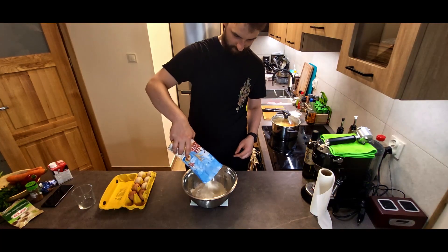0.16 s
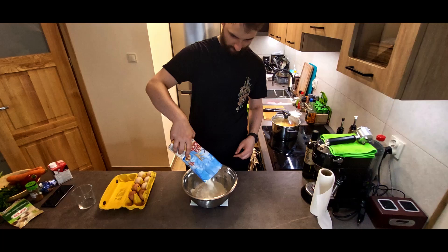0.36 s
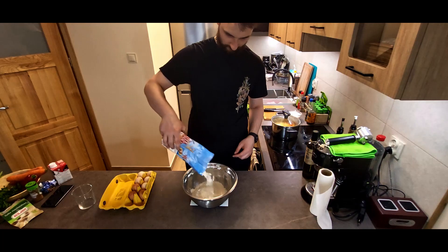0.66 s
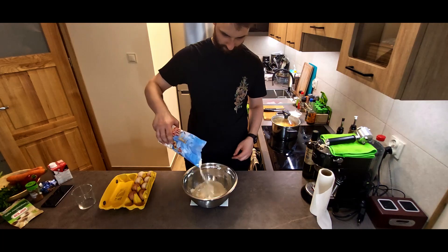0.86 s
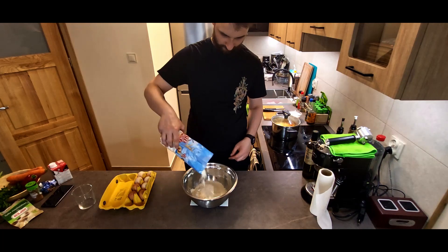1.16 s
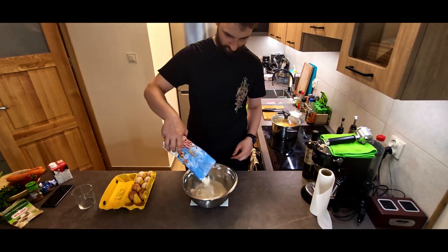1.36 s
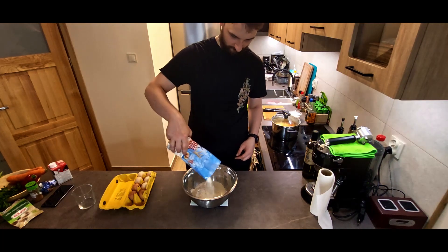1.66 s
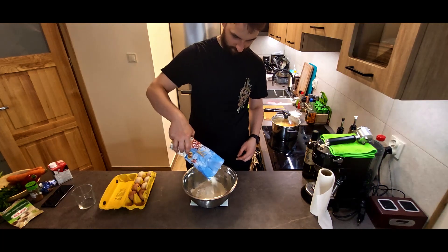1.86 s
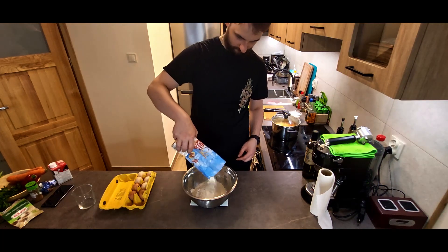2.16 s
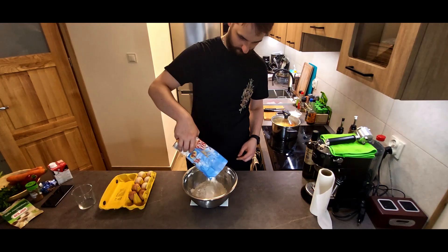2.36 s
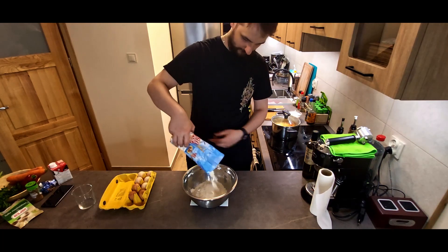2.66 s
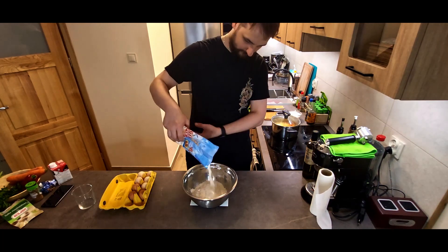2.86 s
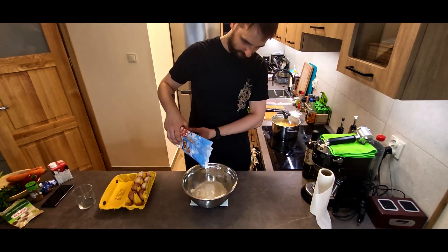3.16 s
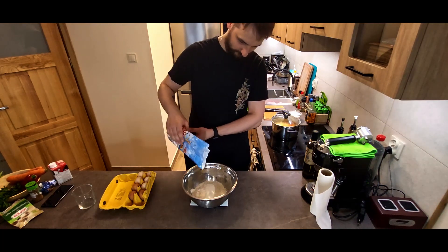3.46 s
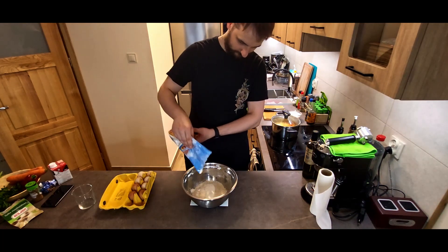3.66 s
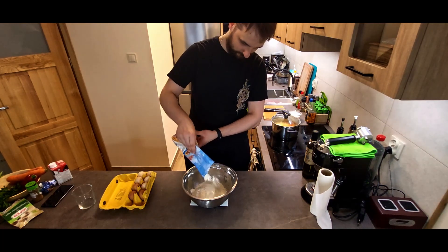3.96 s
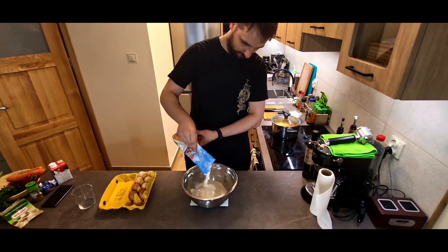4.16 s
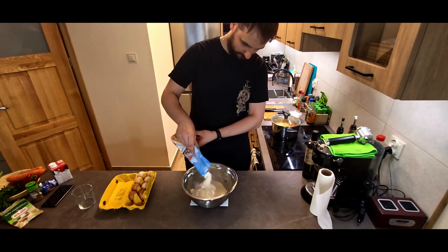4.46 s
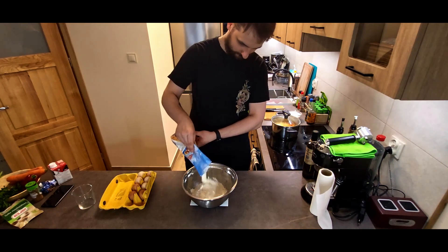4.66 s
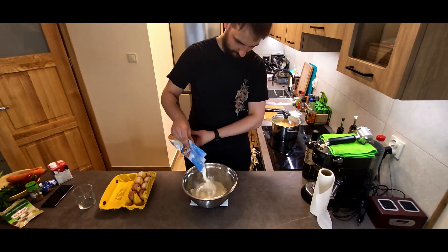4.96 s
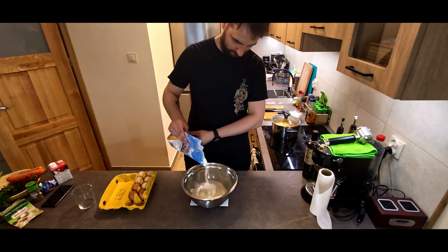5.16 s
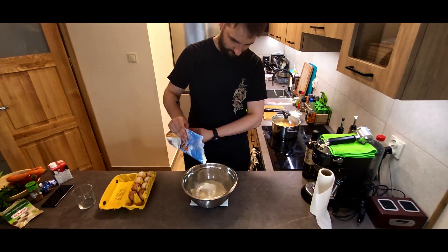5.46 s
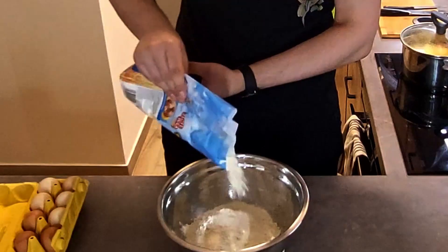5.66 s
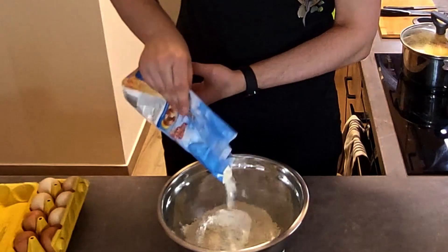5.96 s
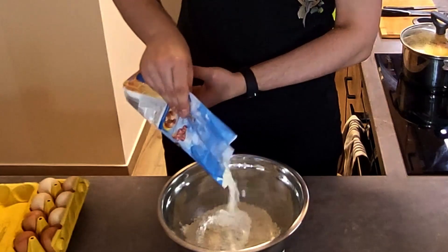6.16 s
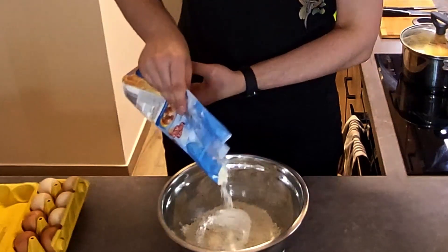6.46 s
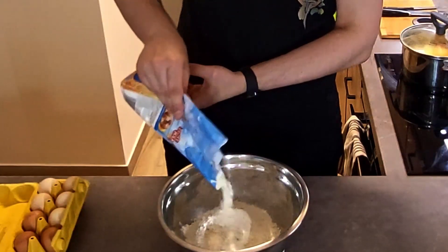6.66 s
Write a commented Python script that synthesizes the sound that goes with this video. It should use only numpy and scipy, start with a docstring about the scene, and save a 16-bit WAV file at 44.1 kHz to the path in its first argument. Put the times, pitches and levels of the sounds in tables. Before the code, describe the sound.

Over a very quiet low rumble of kitchen air, a paper flour bag rustles softly, with tiny ticks around 0.1 s and faint powdery swishes until 0.8 s. From 1.0 to 1.8 s crisp creases snap and pop separately, mixed with short shaking swishes. From 1.9 to 3.0 s it is gentler: quick, even wrist strokes of sliding flour and a few light ticks. Crinkling resumes at 3.05 s and swells into the densest, loudest crumple at 3.5-3.95 s, with bright cracks and hollow bag thuds. After a short calm, another flurry runs 4.4-5.0 s, ending in soft swishes. A near lull follows, then strong pops and crumpling at 5.65-6.2 s, and a last sharp cluster at 6.5-6.8 s. The steel bowl rings faintly beneath; close, almost mono sound with a short small-room tail.

```python
"""A quiet rumble of air and a soft paper rustle open the scene: flour is shaken from a paper bag into a steel bowl.
Squeezes crumple the paper in flurries of noise; creases snap, and their panels pop, ring and shove air.
The bag's walls bulge with hollow low noise as the load slumps; wrist strokes swish flour along the paper.
Resonators make the bowl ring faintly, and echoes with a decaying noise tail make a small kitchen.
Both channels hear nearly the same."""
import sys
import numpy as np
from scipy import signal
from scipy.fft import rfft, irfft
from scipy.io import wavfile
from scipy.ndimage import uniform_filter1d

SR = 44100
rng = np.random.default_rng(int(sys.argv[2]) if len(sys.argv) > 2 else 0)


def put_to_file(sound):
    """Save the sound as 16-bit audio at rate SR, in the file named by the first command-line argument."""
    columns = np.atleast_2d(sound).T  # one column per channel
    safe = np.clip(columns, -1, 1)
    whole_steps = np.round(safe * 32767)
    wavfile.write(sys.argv[1], SR, whole_steps.astype(np.int16))


N = 300321


def from_db(db):
    """Level law: gain is ten to the power of dB / 20."""
    return 10 ** (np.asarray(db) / 20)


def rms_one(x):
    """Normalisation: scale to unit power."""
    return x / np.sqrt(np.mean(x ** 2) + 1e-20)


def evened(x):
    """Level equalisation: divide by the running rms over 50 ms to take out slow swings."""
    return x / np.sqrt(np.abs(uniform_filter1d(x ** 2, size=2200)) + 1e-6)


def in_time(rows):
    """Linear interpolation: each column of a curve, at every sample."""
    s, *columns = np.transpose(rows)
    return [np.interp(np.arange(N) / SR, s, c) for c in columns]


def at_hz(points, hz):
    """Logarithmic pitch: read a table on a log-frequency axis."""
    f, value = np.transpose(points)
    return np.interp(np.log(np.maximum(hz, 1)), np.log(f), value)


def causal_filter(spectrum, size=2048):
    """Minimum phase: fold the cepstrum of a colour into a causal impulse response."""
    hz = np.maximum(np.fft.rfftfreq(size, 1 / SR), 1)
    octaves_out = np.abs(np.log2(hz / np.clip(hz, spectrum[0][0], spectrum[-1][0])))
    # the colour falls 20 dB per octave for two octaves beyond its ends
    level_db = at_hz(spectrum, hz) - 20 * np.minimum(octaves_out, 2)
    cepstrum = irfft(np.log(from_db(level_db)))
    cepstrum[1:size // 2] *= 2
    cepstrum[size // 2 + 1:] = 0
    return irfft(np.exp(rfft(cepstrum)))


def coloured(x, spectrum):
    """Linear filtering: convolve with a colour's response; unit power."""
    return rms_one(signal.oaconvolve(x, causal_filter(spectrum))[:N])


def ring(x, hz, t60):
    """Damped resonance: a two-pole filter with a gain of about 1 at its top."""
    r, w = from_db(-60 / (t60 * SR)), 2 * np.pi * hz / SR
    return signal.lfilter([0, 2 * (1 - r) * np.sin(w)], [1, -2 * r * np.cos(w), r * r], x + 1e-18)


def add(track, s, sound):
    """Superposition: mix a sound in at a time."""
    at = int(np.clip(s * SR, 0, N - 1))
    track[at:at + len(sound)] += sound[:N - at]


def clicks(per_s, spread_db):
    """Shot noise: random clicks of uneven size and either sign; unit power."""
    sizes = from_db(spread_db * np.minimum(rng.exponential(1, N), 4)) * rng.choice([-1, 1], N)
    return rms_one(sizes * (rng.random(N) < per_s / SR))


def grains(per_s, spread_db, rub):
    """Granular friction: many small slips (clicks) over smooth rubbing (white noise)."""
    return evened(clicks(per_s, spread_db) + rub * rng.standard_normal(N))


def gestures(rows, attack_s, release_s):
    """Envelope: exponential attack, hold and exponential release for each row; a gain at every sample."""
    t = np.arange(N) / SR
    total = 0
    for s, held, db in rows:
        before = np.maximum(s - t, 0) / attack_s
        after = np.maximum(t - s - held, 0) / release_s
        total = total + from_db(db) * np.exp(-np.minimum(before + after, 20))
    return total


# colour of the room air: hz [Hz], level_db [dB]
AIR_COLOUR = [(20, -27), (40, -3.5), (70, 5.5), (130, -3.5), (300, -3.5), (600, -7), (1000, -36),
              (2000, -24), (4500, -37.5), (7000, -22.5), (9000, -28.5), (16000, -25.5)]
# colour of the hollow bag: hz [Hz], level_db [dB]
HOLLOW_COLOUR = [(35, -31.5), (70, 0), (120, -1), (220, 0.5), (320, -5.5), (430, -15), (700, -14.5)]


def air():
    """Diffuse background: steady coloured noise, as a shared (mid) and an opposed (side) part."""
    mid = from_db(-58.0) * coloured(rng.standard_normal(N), AIR_COLOUR)
    side = from_db(-74.5) * coloured(rng.standard_normal(N), AIR_COLOUR)
    side = side + from_db(-76.5) * coloured(rng.standard_normal(N), HOLLOW_COLOUR)
    return mid, side


# how hard the hand flexes the paper as it holds the bag, before the trims in rustle():
# start_s [s], crumple_db [dB], fizz_db [dB]
FLEXING_EFFORT = [(0, -47, -45.5), (0.6, -55, -55.5), (0.98, -49.5, -57), (1.2, -44.5, -51),
                  (1.6, -46.5, -50.5), (2.12, -50, -58), (2.86, -50, -52.5), (2.98, -57.5, -58.5),
                  (3.15, -35.5, -49.5), (3.35, -48, -46.5), (3.8, -37, -37), (4.27, -48, -54),
                  (4.6, -37.5, -42.5), (5.02, -50, -51.5), (5.12, -57, -65), (5.64, -57, -66),
                  (6.25, -38.5, -49.5), (6.48, -53, -55)]
# the fingers tighten and the paper crumples, before the same trims:
# start_s [s], held_s [s], crumple_db [dB], fizz_db [dB]
SQUEEZE_EFFORT = [(1.07, 0.027, -36.5, -43), (3.105, 0.027, -36, -42.5), (3.50, 0.17, -41, -44.5),
                  (3.74, 0.049, -25.5, -23.5), (3.82, 0.074, -29.5, -41), (3.969, 0.024, -22.5, -26.5),
                  (4.44, .15, -31.5, -31), (5.70, 0.16, -28.5, -33), (5.90, 0.29, -36, -49),
                  (6.629, .15, -29.5, -38.5)]
SQUEEZE_ATTACK_S, SQUEEZE_RELEASE_S = 0.012, 0.03


def paper_effort():
    """Power addition: steady flexing and squeezes together; crumple dB and fizz dB at every sample."""
    efforts_db = []
    for k, flex_db in enumerate(in_time(FLEXING_EFFORT)):
        rows = [(s, held, levels[k]) for s, held, *levels in SQUEEZE_EFFORT]
        squeeze = gestures(rows, SQUEEZE_ATTACK_S, SQUEEZE_RELEASE_S)
        efforts_db.append(20 * np.log10(np.hypot(from_db(flex_db), squeeze)))
    return efforts_db


def small_panels(per_s=200, spread_db=3.0, cycles=10, count=16):
    """Modal excitation: small paper facets flip at random, each ringing at a pitch of its own."""
    flips, facet = clicks(per_s, spread_db), rng.integers(0, count, N)
    total = 0
    for k, hz in enumerate(np.geomspace(450, 3800, count)):
        total = total + ring(flips * (facet == k), hz, cycles / hz)
    return rms_one(total)


def avalanches(per_s, depth, decay_s):
    """Avalanche dynamics: creases set off their neighbours in brief flurries; a gain of power about 1."""
    kicks = (rng.random(N) < per_s / SR) * rng.uniform(0.38, 1, N)
    flurry = signal.lfilter([1], [1, -np.exp(-1 / (decay_s * SR))], kicks + 1e-18)
    return evened(1 + 10 * depth * flurry)


# colour of the coarse crumpling: hz [Hz], level_db [dB]
CRUMPLE_COLOUR = [(150, -12.5), (320, -5), (460, -3), (650, -4.5), (820, 3), (1200, -1), (2000, -10),
                  (2900, -12.5), (4500, -20)]
# colour of the fine fizz of fibres: hz [Hz], level_db [dB]
FIZZ_COLOUR = [(2000, 1), (3500, -3), (4500, -6.5), (6000, -3.5), (7300, -9), (8600, -9.5), (11000, -9.5),
               (16000, -21)]
BUCKLING_DB = -44   # crumple effort at which the paper buckles


def rustle(crumple_db=-4.0, fizz_db=-4.5):
    """Buckling threshold: lightly flexed paper mostly rubs, then crumples in flurries; fibres fizz on top."""
    coarse_db, fine_db = paper_effort()
    buckling = from_db(np.minimum(coarse_db - BUCKLING_DB, 0))
    flurries = 1 + buckling * (avalanches(per_s=40, depth=0.35, decay_s=0.005) - 1)
    rub = from_db(-9) * coloured(rng.standard_normal(N), CRUMPLE_COLOUR)
    coarse = evened(buckling * coloured(small_panels(), CRUMPLE_COLOUR) + rub)
    fine = coloured(grains(per_s=1500, spread_db=2.5, rub=0.7), FIZZ_COLOUR)
    return flurries * (from_db(coarse_db + crumple_db) * coarse + from_db(fine_db + fizz_db) * fine)


# the load slumps and the whole bag bulges: start_s [s], held_s [s], level_db [dB]
SLUMP_GESTURES = [(0.055, 0.036, -47), (3.575, 0.056, -35), (3.745, 0.017, -43.5), (5.80, .02, -42.5),
                  (6.59, 0.16, -40)]
SLUMP_ATTACK_S, SLUMP_RELEASE_S = 0.013, 0.058
# between slumps the walls work softly as the flour drains: start_s [s], level_db [dB]
WALL_LEVELS = [(0, -57), (1.2, -54), (2.9, -62), (4.7, -62.5), (5.5, -65), (6.3, -54.5)]


def wall_motion():
    """Power addition: the motion of the bag's walls, and by how many dB a slump raises it."""
    resting = from_db(in_time(WALL_LEVELS)[0])
    motion = np.hypot(resting, gestures(SLUMP_GESTURES, SLUMP_ATTACK_S, SLUMP_RELEASE_S))
    return motion, 20 * np.log10(motion / resting)


def bulge():
    """Wall radiation: the moving bag walls give soft, hollow knocks."""
    return wall_motion()[0] * coloured(grains(per_s=430, spread_db=3.5, rub=0.63), HOLLOW_COLOUR)


CREASES_PER_S, CREASE_HZ = 18, 1240   # candidate creases, and the usual panel pitch
CREASE_DB, CREASE_GROWTH = -44, 0.58   # pop level at buckling, dB gained per dB of further flexing
CREASE_CRACK_DB, CREASE_SPREAD_DB = -6.5, 2.5   # crack relative to pop, scatter of both levels


def lesser_creases(count=140):
    """Threshold process: small snaps at random moments, fading below buckling; rows like the loud ones."""
    chance, scatter = rng.random(count), rng.standard_normal((count, 3))
    times = np.minimum((np.arange(count) + chance) / CREASES_PER_S, N / SR)
    past_db = np.interp(times * SR, np.arange(N), paper_effort()[0]) - BUCKLING_DB
    levels = CREASE_DB + CREASE_GROWTH * past_db + np.minimum(past_db, 0)
    rows = []
    for s, db, (a, b, c) in zip(times, levels, scatter):
        hz = CREASE_HZ * 2 ** (0.5 * b)
        rows.append((s, db + CREASE_SPREAD_DB * a, hz, CREASE_CRACK_DB + CREASE_SPREAD_DB * c))
    return rows


def scattered(delay_s, size, count):
    """Dispersion: a slip spreads through the sheet, every frequency whole but with its own delay."""
    delays = delay_s * rng.gamma(2, 0.5, count)   # delay_s is their mean
    per_bin = np.interp(np.linspace(0, count - 1, size // 2 + 1), np.arange(count), delays)
    # group delay accumulates into phase
    return irfft(np.exp(-2j * np.pi * np.cumsum(per_bin) * SR / size), size)


def snap_part(force, response):
    """Impulse excitation: a short force through a response, with the energy of 6 ms at unit power."""
    x = signal.fftconvolve(force, response)[:len(force)]
    return x * np.sqrt(0.006 * SR / np.sum(x ** 2))


# the loud creases snapping, before the trims of each part in snaps():
# start_s [s], level_db [dB], pitch_hz [Hz], crack_re_pop_db [dB]
LOUD_SNAPS = [(0.0544, -39, 700, -10), (0.078, -38, 504, -14), (0.1097, -31, 1370, -11),
              (0.9144, -41.5, 744, -8), (1.0296, -26, 2190, -5.5), (1.0664, -24, 925, -3.5),
              (1.1273, -24.5, 2020, -3), (1.2089, -33, 800, -14), (1.2887, -27, 776, -19),
              (1.5962, -22, 1120, -6.5), (1.6952, -25.5, 960, -24), (1.7997, -20.5, 1580, -10),
              (2.5439, -32, 880, -21), (2.7512, -40, 2520, -3), (3.0609, -38.5, 2540, -2),
              (3.0939, -26, 910, -14.5), (3.1587, -28.5, 890, -24), (3.2733, -32.5, 1490, -6.5),
              (3.366, -30, 1010, -14), (3.4332, -29, 610, -15), (3.4751, -26, 700, -1),
              (3.5699, -25, 764, -17), (3.5805, -16, 875, -10), (3.6336, -22, 1510, -6.5),
              (3.6796, -29.5, 1560, -4), (3.7215, -18, 2090, 0.5), (3.7475, -18, 1510, -7),
              (3.7722, -16.5, 1440, 1), (3.7844, -16, 1630, -2.5), (3.842, -21, 1740, -4),
              (3.9123, -21.5, 890, 1.5), (3.9432, -25, 1380, 0.5), (4.179, -40.5, 1320, -7),
              (4.3857, -26.5, 2560, -1.5), (4.4266, -28.5, 1158, -9), (4.4434, -33.5, 1630, 6.5),
              (4.4718, -34.5, 1225, 5), (4.5457, -20.5, 1005, -3.5), (4.578, -21, 870, -7.5),
              (4.6399, -31.5, 1510, -16), (4.8122, -29.5, 1570, -4.5), (4.9553, -27, 1770, -1),
              (5.3759, -41.5, 1440, -12.5), (5.4673, -31, 1970, -4), (5.663, -19, 920, -13.5),
              (5.6927, -17.5, 1760, -2), (5.7606, -16.5, 760, -3), (5.807, -20, 900, -5.5),
              (5.9058, -28, 970, -14), (5.921, -31.5, 1190, -9), (5.9876, -31, 1090, -26),
              (6.0365, -27.5, 820, -8.5), (6.1192, -36.5, 1030, -16), (6.1819, -22.5, 1245, -20),
              (6.4897, -39, 2000, 2.5), (6.5439, -25.5, 2000, -4), (6.6253, -20.5, 814, -5),
              (6.662, -22, 2010, -10), (6.7598, -22, 843, -1.5), (6.7921, -25, 2000, -5.5)]
# colour of the panel's pop: hz [Hz], level_db [dB]
POP_COLOUR = [(350, -26), (600, -6.5), (780, 4.5), (1100, 5.5), (2000, 6), (2800, -5.5), (4200, -33.5)]
# colour of the crease's crack: hz [Hz], level_db [dB]
CRACK_COLOUR = [(1600, -23), (2500, 5.5), (3100, 3), (3600, 3), (4100, 5), (4600, 1.5), (5200, 4),
                (7400, 0), (8800, -20.5)]
# colour of the crack's bright top: hz [Hz], level_db [dB]
SPIT_COLOUR = [(7000, -10), (8500, 2.5), (11000, 4), (16000, -11)]
# colour of the shoved air: hz [Hz], level_db [dB]
THUMP_COLOUR = [(50, -15), (110, -30.5), (190, -6), (240, -1.5), (330, -8.5), (450, 1), (600, -0.5),
                (900, -39.5)]
# large, low panels shove more air, and more still while the load slumps against them
THUMP_DB_PER_OCTAVE, THUMP_FOLLOWS_SLUMP = -4.5, 0.19   # the second is dB per dB of slump


def snaps(crack_s=0.0013, pop_s=0.0025, thump_t60=0.03, flip_s=0.00046, panel_cycles=16,
          panel_db=-3.5, pop_db=-2.0, thump_db=-11.5, spit_db=6.0, spit_growth=1.695,
          after_db=-18.0, after_t60=0.0094, mode_db=-8.5, size=2600, count=10):
    """Snap-through: a crease cracks, its panel flips and rings, and shoves air; a track for each facing."""
    out, t = np.zeros((count, N)), np.arange(size) / SR
    colours = (POP_COLOUR, CRACK_COLOUR, SPIT_COLOUR, THUMP_COLOUR)
    pop_ir, crack_ir, spit_ir, thump_ir = [causal_filter(c) for c in colours]
    flip = 1 - np.exp(-t / flip_s)   # a panel takes a moment to get moving
    slump_db = wall_motion()[1]
    for k, (s, level_db, hz, high_db) in enumerate([*LOUD_SNAPS, *lesser_creases()]):
        low_db = THUMP_DB_PER_OCTAVE * np.log2(hz / CREASE_HZ)
        low_db += THUMP_FOLLOWS_SLUMP * slump_db[min(int(s * SR), N - 1)]
        white = rng.standard_normal((2, size))

        # the main slip is trailed by a run of tiny ones and coloured by the panel's second mode
        slips = scattered(crack_s, size, count=60) + from_db(after_db - 60 * t / after_t60) * white[0]
        second_mode = ring(slips, 2 * hz, 0.5 * panel_cycles / (2 * hz))
        crack = snap_part(slips + from_db(mode_db) * second_mode, crack_ir)
        spit = snap_part(slips, spit_ir)

        # the pop is broadly centred on the panel's pitch
        push = scattered(pop_s, size, count=130)
        pop = snap_part(push + from_db(mode_db) * ring(push, hz, 2 / hz), pop_ir)
        thump = snap_part(white[1] * flip * from_db(-60 * t / thump_t60), thump_ir)
        swing = np.sin(2 * np.pi * hz * t) * flip
        panel = snap_part(swing * from_db(-60 * t * hz / panel_cycles), pop_ir)
        panel = panel * np.sign(panel @ pop)   # it swings the way it is pushed

        body = from_db(pop_db) * pop + from_db(panel_db) * panel + from_db(low_db + thump_db) * thump
        sharp_db = level_db + high_db
        # harder cracks are brighter
        edge = from_db(sharp_db) * crack + from_db(spit_growth * sharp_db + spit_db) * spit
        add(out[k % count], s, from_db(level_db) * body + edge)
    return out


# spells of shaking the flour out, before the trim in swishes():
# first_stroke_s [s], last_stroke_s [s], level_db [dB]
SHAKING_SPELLS = [(0.216, 0.301, -52.5), (0.394, 0.451, -48), (0.658, 0.731, -52.5), (1.285, 1.37, -43),
                  (1.469, 1.525, -44), (1.963, 2.031, -50), (2.223, 2.567, -48), (2.735, 2.851, -50),
                  (4.761, 4.908, -47.5), (5.204, 5.28, -63.5), (6.3, 6.40, -50.5)]
STROKE_S, STROKE_JITTER_S, STROKE_SPREAD_DB = 0.087, 0.004, 1   # nominal period, scatter of time and level


def strokes():
    """Quasi-periodic motion: the wrist swings at a nearly even pace in each spell; rows of s, dB."""
    rows = []
    for first, last, db in SHAKING_SPELLS:
        swings = max(round((last - first) / STROKE_S), 1) + 1
        for s in np.linspace(first, last, swings):
            late, strong = rng.standard_normal(2)
            rows.append((s + STROKE_JITTER_S * late, db + STROKE_SPREAD_DB * strong))
    return rows


# colour of flour sliding on paper: hz [Hz], level_db [dB]
SWISH_COLOUR = [(200, -31.5), (450, 3), (900, -7.5), (1400, 2.5), (2700, -1), (3800, -10.5), (6800, -5),
                (8600, -16), (16000, -19)]


def swishes(rise_s=0.017, fall_s=0.0098, level_db=3.5):
    """Granular sliding: at each stroke the powder slides a little way and stops."""
    slide = np.zeros(N)
    t = np.arange(-SR // 10, SR // 10) / SR
    shape = np.exp(-0.5 * (t / np.where(t < 0, rise_s, fall_s)) ** 4)
    for s, db in strokes():
        add(slide, s + t[0], from_db(db + level_db) * shape)
    return slide * coloured(grains(per_s=2000, spread_db=1.0, rub=1.0), SWISH_COLOUR)


# modes of the steel bowl, before the trim in bowl(): pitch_hz [Hz], level_db [dB]
BOWL_MODES = [(439, -19), (829, -13), (863, -8), (1339, 3), (1511, -25), (1718, -2), (1881, -4),
              (1985, -20), (2101, -22)]


def bowl(x, level_db=3.0, t60=0.26):
    """Sympathetic resonance: narrow steel modes pick up the sound of the bag just above the rim."""
    return sum(from_db(db + level_db) * ring(x, hz, t60) for hz, db in BOWL_MODES)


# worktop and wall reflections, nominal delay: delay_s [s], level_db [dB]
EARLY_ECHOES = [(.0027, -9), (.0095, -9)]
# reverberation of the kitchen: band_hz [Hz], t60_s [s]
KITCHEN_DECAY = [(150, 0.28), (500, 0.19), (1400, 0.25), (4000, 0.28), (8000, 0.16), (15000, 0.12)]


def kitchen(x, wet_db=-3.0, build_s=0.00067, size=24000):
    """Reverberation: early reflections and a diffuse tail dying band by band, drawn anew for each source."""
    t, hz = np.arange(size) / SR, np.fft.rfftfreq(size, 1 / SR)
    white, tail = rfft(rng.standard_normal(size)), 0
    for centre, t60 in KITCHEN_DECAY:
        share = at_hz([(f, f == centre) for f, _ in KITCHEN_DECAY], hz)   # overlapping bands
        tail = tail + irfft(white * share, size) * from_db(-60 * t / t60)
    tail = tail * (1 - np.exp(-(t / build_s) ** 2))
    response = from_db(wet_db) * tail / np.linalg.norm(tail)
    for s, db in EARLY_ECHOES:
        delay_s = s * (1 + 0.06 * rng.standard_normal())   # each direction meets other walls
        response[int(delay_s * SR)] += from_db(db)
    return signal.oaconvolve(x, response)[:N]


def scene():
    """Superposition: the bag over the bowl, in the room, on a quiet rumble of air."""
    air_mid, air_side = air()
    sources = [*snaps(), rustle(), swishes() + bulge()]
    bag = sum(x + kitchen(x) for x in sources)
    mid = bag + bowl(sum(sources)) + air_mid
    return np.array([mid + air_side, mid - air_side])


CUTOFF_HZ = 15900


def record(dry):
    """Saturation and band limiting: the highest peaks are rounded, the top is cut."""
    top = 1.1   # ceiling of the rounding
    rounded = top * np.tanh(dry / top)
    low_pass = signal.ellip(10, 0.2, 80, CUTOFF_HZ, fs=SR, output="sos")
    return signal.sosfilt(low_pass, rounded)


dry = scene()
out = record(dry)
put_to_file(out)
```